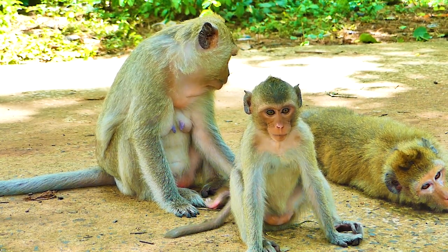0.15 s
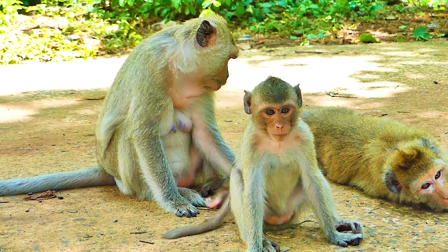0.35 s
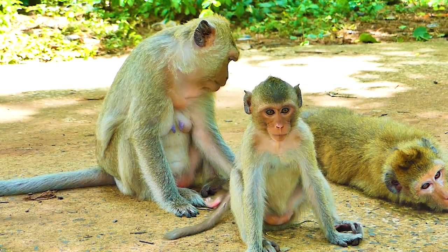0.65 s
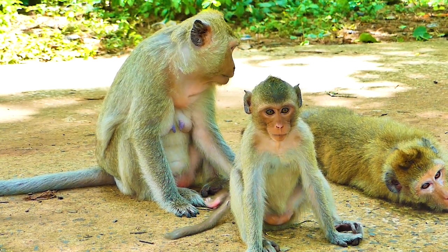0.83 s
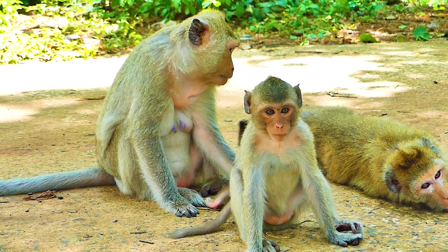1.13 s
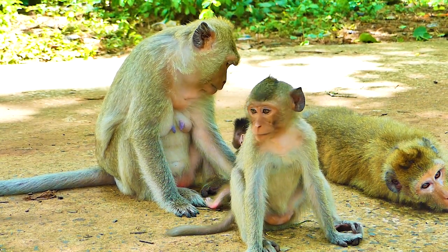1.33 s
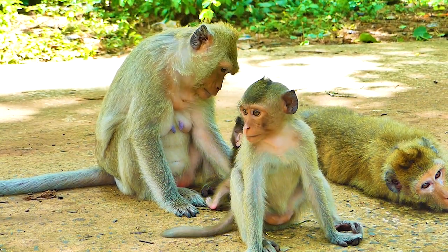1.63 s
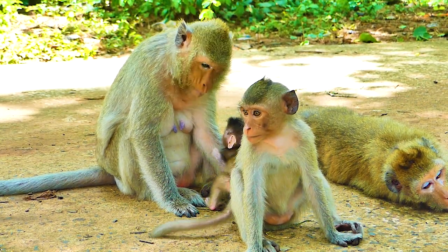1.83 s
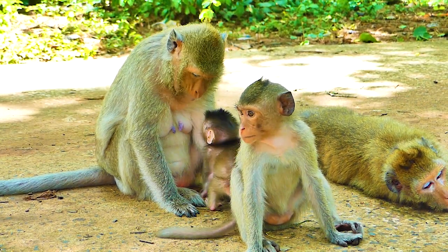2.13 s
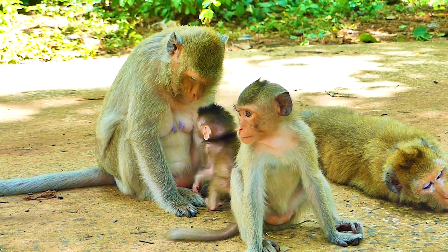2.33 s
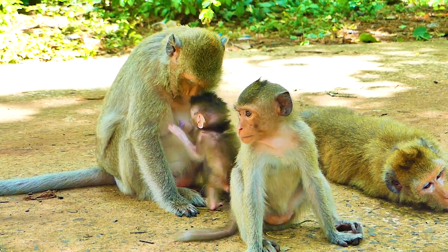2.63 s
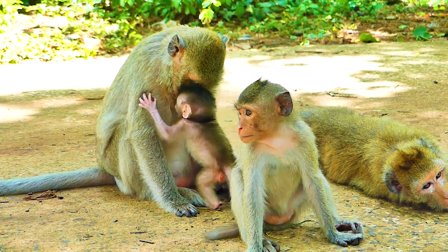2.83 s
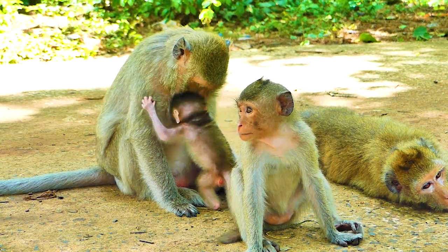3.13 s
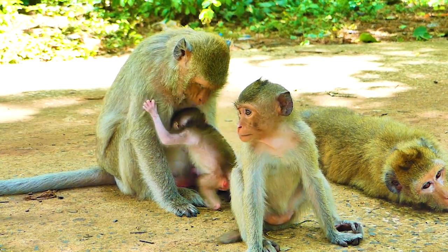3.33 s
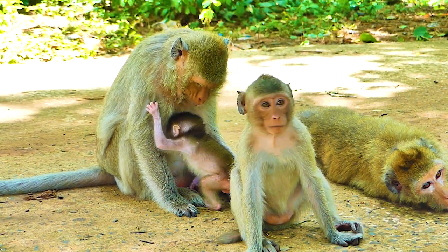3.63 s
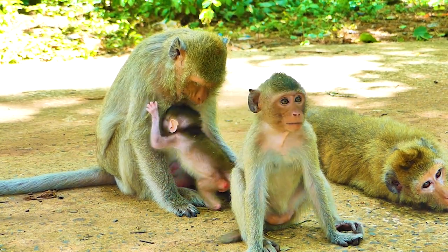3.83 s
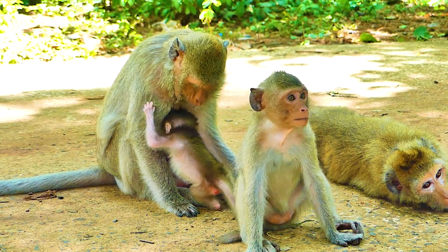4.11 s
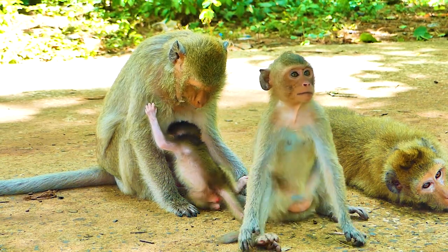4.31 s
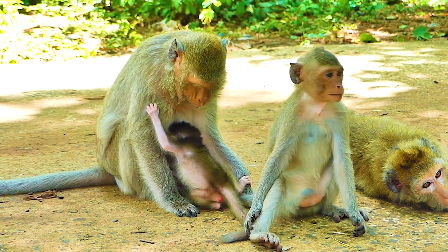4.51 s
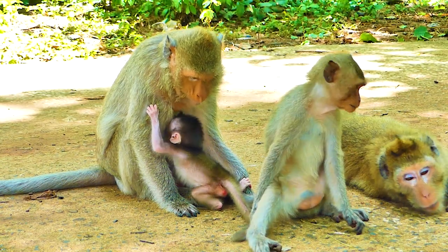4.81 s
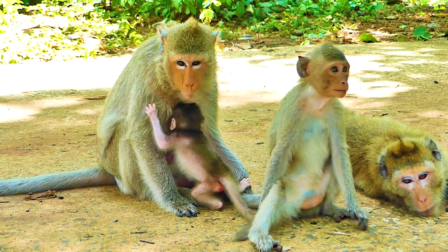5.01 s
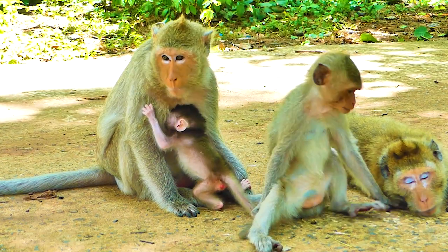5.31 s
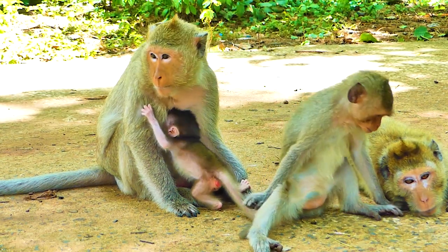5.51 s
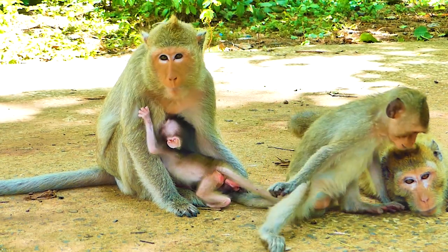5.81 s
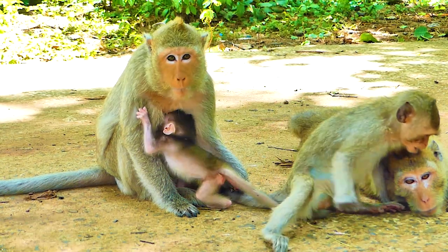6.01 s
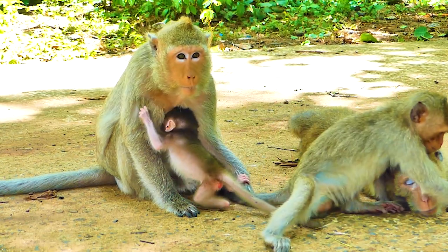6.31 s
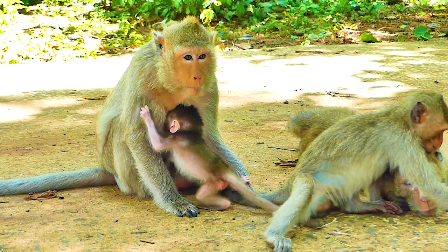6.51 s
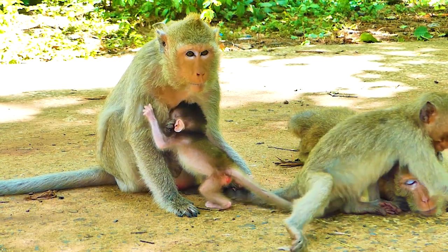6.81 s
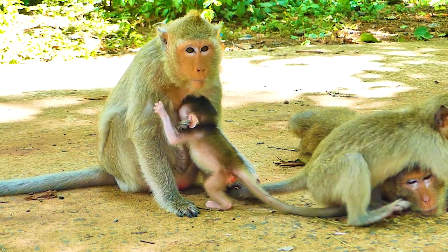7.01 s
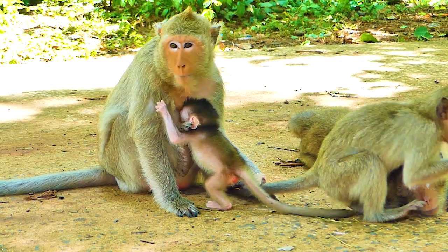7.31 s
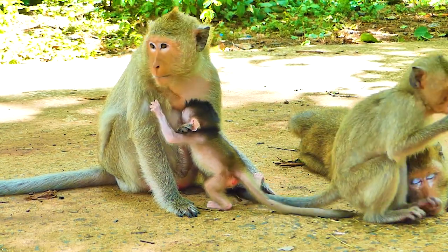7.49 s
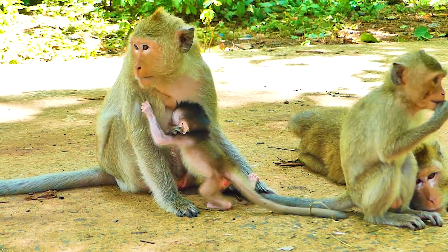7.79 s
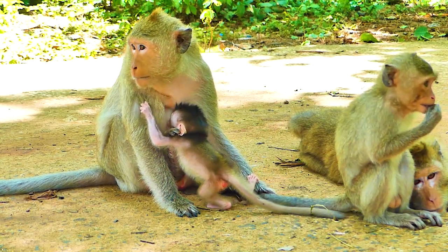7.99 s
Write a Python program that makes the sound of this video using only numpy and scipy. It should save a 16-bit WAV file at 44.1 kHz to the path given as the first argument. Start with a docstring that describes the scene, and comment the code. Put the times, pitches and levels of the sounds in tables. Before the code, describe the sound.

A cicada trills in slow surges that grow louder over rustling leaves and faint birds, while monkeys scuff and snap grit close by.

```python
"""Cicada and monkeys at a forest edge

A paved clearing in stereo. A low rumble with a narrow drone lies far off; filtered noise rustles as leaves.
A cicada, clicks ringing at a gliding pitch, trills in slow surges that grow louder over a thin, steady insect
of narrow noise. Birds, most of their tones gliding, whistle and chirp far off in the trees. Close to the
microphones monkeys shift about on gritty ground: noise bursts snap and knock, runs of tiny grains scuff."""
import sys
import numpy as np
from scipy import signal
from scipy.fft import rfft, irfft, next_fast_len
from scipy.io import wavfile
from scipy.ndimage import uniform_filter1d

SR = 44100
rng = np.random.default_rng(int(sys.argv[2]) if len(sys.argv) > 2 else 0)


def transcribe(u):
    """Save the signal u as a 16-bit wav file named by the first command-line argument.

    u: samples, shape (n,) or (channels, n), limited to [-1, 1]; the rate is SR.
    q: integer samples, one column per channel.
    """
    v = np.clip(np.atleast_2d(u).T, -1, 1)
    q = np.round(v * 32767).astype(np.int16)
    wavfile.write(sys.argv[1], SR, q)


N = 359415
TIME = np.arange(N) / SR  # s

# where the monkeys sit: left minus right [dB]
LEFT, MIDDLE, RIGHT = 7.9, 0, -6.5

# spectrum of the far rumble: (frequency [Hz], relative level [dB])
RUMBLE_SPECTRUM = [(15, -68.5), (25, -51), (60, -9.5), (114, -2), (162, 0.5), (189, 1), (285, -6),
                   (354, -6), (450, -6.5), (637, -10), (680, -14.5), (2400, -24), (3250, -40), (4220, -22),
                   (4500, -24), (5850, -65), (9900, -120)]
# spectrum of the foliage: (frequency [Hz], relative level [dB])
LEAF_SPECTRUM = [(900, -3), (2000, 1), (3000, 3.5), (4200, 0.5), (6300, 1), (7800, -3), (9600, 0),
                 (11500, -3.5), (15500, -9)]
# colour of sounds made on the paving: (frequency [Hz], gain [dB])
GROUND_COLOUR = [(120, 4), (280, 5), (520, 1), (790, -1.5), (1100, -0.5), (1600, -4), (2500, 1.16),
                 (3700, -3.5), (4600, -0.5), (7000, -0.5), (7800, -4.5), (9500, 1.5), (14000, -5.5)]
# stereo width of the surroundings: (frequency [Hz], side minus middle [dB])
SURROUND_WIDTH = [(60, -1), (110, -3.5), (200, -2.5), (380, 2.5), (700, 2), (1290, 1.5), (2380, -3.5),
                  (4400, -6), (8120, -7), (15000, 0)]
# leaves stirred by the breeze: (time of the height [s], half length [s], rise [dB])
BREEZE_GUSTS = [(0.832, 0.21, 4), (1.683, 0.44, 1.5), (3.948, 0.28, 7), (4.795, 0.16, 4), (5.43, 0.14, 5.5),
                (6.55, 0.23, 3.5), (8.016, 0.22, 2)]
# a short piece of cicada song, then bird whistles, most of them falling, one level:
# (time [s], length [s], start [Hz], end [Hz], hoarseness [share of the pitch],
# level [dB], swell from start to end [dB])
GLIDES = [(0.068, 0.04, 5180, 4930, .005, -58, -5), (1.461, .16, 3300, 2726, .045, -59.5, -4),
          (1.945, .22, 3106, 2400, .018, -60.5, 1), (2.243, 0.07, 2700, 2590, .015, -61, 0),
          (2.43, 0.215, 3074, 2477, .026, -56, 14), (4.721, 0.26, 2190, 2005, .003, -56.5, 1),
          (5.124, 0.27, 2317, 2040, 0.0067, -54, -8), (6.039, 0.12, 2900, 2630, .012, -60, 5),
          (6.565, 0.27, 1940, 1700, 0.0036, -60, -4), (6.962, 0.26, 1990, 1615, .006, -64, -4),
          (7.91, 0.2, 1770, 1770, .002, -67.5, -5)]
CICADA_PIECE, BIRD_WHISTLES = GLIDES[:1], GLIDES[1:]
# slurs that arch over and fall back: (time [s], length [s], start [Hz], top [Hz], end [Hz],
# place of the top in the note [0-1], hoarseness [share of the pitch], level [dB])
ARCHED_CHIRPS = [(1.313, .11, 2800, 3850, 3500, 0.68, .07, -58),
                 (1.591, .11, 2750, 3360, 3000, .36, .05, -56.5),
                 (2.014, .12, 2780, 3860, 3450, 0.54, 0.068, -59),
                 (2.303, .11, 3050, 3484, 3260, .3, .06, -58),
                 (6.124, .088, 2620, 3350, 2720, 0.42, .014, -48.5)]
# high, quick chips: (time [s], level [dB])
HIGH_CHIPS = [(2.613, -56), (4.228, -50.5), (7.738, -49.5)]
# cicada surges, a low swell that climbs to a held note and sags again:
# (time [s], low pitch [Hz], held pitch [Hz], swell level [dB], held level [dB]), before strain and sag
CICADA_SURGES = [(.45, 5150, 5390, -60.5, -71), (1.26, 5210, 5420, -58, -67),
                 (2.08, 5180, 5410, -57, -66.5), (2.91, 5170, 5400, -55, -63),
                 (3.75, 5170, 5380, -54.5, -63), (4.56, 5120, 5440, -50.5, -54),
                 (5.33, 5073, 5583, -53.5, -54.5), (6.19, 5130, 5540, -47.5, -51),
                 (6.99, 5076, 5545, -46.5, -50.5), (7.77, 5130, 5516, -46.5, -51.5)]
# hands and feet scuffing: (time [s], length [s], level [dB], weight [dB], place [dB])
MONKEY_SCUFFS = [ (0.137, 0.072, -58.5, -8, LEFT), (.801, 0.069, -58, -7, LEFT),
                 (2.167, 0.055, -58, -6, LEFT), (2.272, 0.048, -57, -2, LEFT),
                 (3.295, 0.055, -64, -15, MIDDLE), (3.39, 0.13, -63.5, -10, MIDDLE),
                 (4.785, 0.06, -51, 1, RIGHT), (5.4, 0.027, -44.5, -8, RIGHT),
                 (5.433, 0.04, -45.5, 1.5, RIGHT), (5.565, 0.043, -52, 8, RIGHT),
                 (5.864, 0.079, -49, 0.5, RIGHT), (5.915, 0.056, -43, 4, RIGHT),
                 (5.968, .12, -56.5, -4.5, RIGHT), (6.296, 0.025, -61, 9.5, RIGHT),
                 (6.41, .025, -74, -28, RIGHT), (6.46, 0.031, -51, 3.5, RIGHT),
                 (6.533, .06, -62.5, 9, RIGHT), (7.199, 0.085, -58, -8.5, LEFT),
                 (7.722, 0.029, -56.5, 8, RIGHT), (8.018, 0.039, -76, -35, RIGHT)]
# hands and feet set down: (time [s], knock level [dB], decay [s], knock [Hz], grit underneath [dB], place [dB])
MONKEY_STEPS = [(.260, -52.5, .0016, 700, -0.5, LEFT), (.695, -52.5, 0.0049, 900, -7, LEFT),
                (1.187, -45.5, 0.0028, 430, -26, LEFT), (4.991, -32.5, 0.0012, 524, -16, RIGHT),
                (5.050, -36, 0.0045, 562, -17, RIGHT), (5.397, -29.5, 0.004, 676, 1, RIGHT),
                (5.558, -38, 0.0055, 418, -26, RIGHT), (5.571, -33.5, 0.0025, 1100, -4.5, RIGHT),
                (5.585, -36, 0.0021, 700, -13, RIGHT), (5.6093, -30.5, 0.0022, 442, -5, RIGHT),
                (5.628, -52, 0.0018, 716, -25, RIGHT), (6.482, -43, 0.0069, 400, -18, RIGHT),
                (6.541, -39.5, 0.0023, 1000, -4, RIGHT)]
# dry bits snapping: (time [s], level [dB], pitch [Hz], decay [s], place [dB])
DRY_SNAPS = [ (.036, -41.5, 9930, 0.0059, MIDDLE), (1.429, -53, 5520, 0.0015, LEFT),
             (1.597, -51, 6200, .0033, LEFT), (1.84, -41.5, 3660, .0013, LEFT),
             (2.186, -46, 3200, 0.01, LEFT), (3.307, -49, 5500, .0007, MIDDLE),
             (3.318, -46.5, 5500, .0007, MIDDLE), (3.349, -48, 4410, .0012, MIDDLE),
             (3.411, -53, 5800, .0016, MIDDLE), (4.756, -40.5, 2400, 0.003, RIGHT),
             (4.793, -36.5, 3550, 0.0017, RIGHT), (4.810, -32.5, 2400, .002, RIGHT),
             (5.014, -41.5, 2280, 0.0043, RIGHT), (5.3954, -29.5, 3930, .004, RIGHT),
             (5.454, -35, 2900, .0018, RIGHT), (5.4967, -30, 2600, 0.0015, RIGHT),
             (5.608, -29.5, 2470, 0.00077, RIGHT), (5.824, -42.5, 2280, 0.002, RIGHT),
             (5.837, -42, 3080, 0.0013, RIGHT), (5.882, -35, 3450, 0.0036, RIGHT),
             (5.894, -33.5, 3430, 0.0041, RIGHT), (5.912, -17.5, 2700, 0.0013, RIGHT),
             (5.952, -35, 2900, .0012, RIGHT), (5.962, -37, 2700, .001, RIGHT),
             (6.221, -44, 2100, .001, RIGHT), (6.304, -28, 2460, 0.0013, RIGHT),
             (6.465, -32, 2700, 0.0022, RIGHT), (6.48, -38, 4500, 0.0027, MIDDLE),
             (6.6273, -41.5, 3770, 0.0008, RIGHT), (6.661, -29.5, 3570, 0.0013, RIGHT),
             (6.791, -32, 3450, 0.0015, RIGHT), (7.202, -33.5, 2390, 0.0012, LEFT),
             (7.250, -41, 4510, 0.00096, LEFT), (7.7336, -28.5, 2360, .0011, RIGHT),
             (7.8265, -37, 4290, 0.0016, RIGHT)]

RUMBLE_DB, RUMBLE_RISE_DB_PER_S = -53.5, 0.1928
CALM_LEAVES_DB = -61.5
FAR_INSECT_HZ, FAR_INSECT_WIDTH_HZ, FAR_INSECT_DB = 5400, 150, -71
GLIDE_EASE = 1.9  # above 1, a glide is steepest at first
CHIRP_SWELL_DB = -3
CHIP_S, CHIP_START_HZ, CHIP_END_HZ, CHIP_QUAVER = 0.0259, 6260, 5600, 0.051
SURGE_PERIOD_S = .814
CLIMB_SKEW, CLIMB_ROUNDNESS = .7, .54
SWELL_LAG_S, SWELL_ATTACK_S, SWELL_RELEASE_S = 0.0577, .1, .16
SAG_DB, SAG_SHARE = 3.5, 0.68  # depth of the dip in level and its place in the surge
GRIT_DB, GRIT_PER_WEIGHT = -7.5, -0.75  # the more weight, the less grit skitters (dB, dB per dB)
STEP_RING_HZ, STEP_CRACK_DB = 2520, -9.5
DRAG_S, DRAG_DB, DRAG_WEIGHT_DB = 0.026, -24, 7.5  # every step slides a little
SNAP_KNOCK_HZ, SNAP_KNOCK_DB = 780, -11.5
# thinner bits ring higher and crack more brightly, up to a limit
CRACK_DB, CRACK_REF_HZ, CRACK_DB_PER_OCTAVE, CRACK_MAX_DB = -16.5, 3050, 29, -5.5
TOP_HZ = 15800


def undb(db):
    """Decibels to gain."""
    return 10 ** (np.asarray(db) / 20)


def unit(x):
    """Scale to rms 1."""
    return x / np.sqrt(np.mean(x ** 2) + 1e-24)


def band(x, hz, width_hz, order=1):
    """A resonance with gain 1 at its centre; applied twice it is steep."""
    hz = min(hz, .44 * SR)
    g, k = np.tan(np.pi * hz / SR), width_hz / hz
    numerator = [g * k, 0, -g * k]
    denominator = [1 + g * k + g * g, 2 * g * g - 2, 1 - g * k + g * g]
    for _ in range(order):
        x = signal.lfilter(numerator, denominator, x)
    return x


def walk(rate):
    """Random levels held for 1 / rate s and smoothed twice, at rms 1."""
    hold = max(int(SR / rate), 1)
    held = np.repeat(rng.standard_normal(N // hold + 1), hold)
    return unit(uniform_filter1d(uniform_filter1d(held, hold), hold)[:N])


def colour(x, points):
    """Filter a sound with a response of (frequency [Hz], gain [dB]) points."""
    hz, db = np.transpose(points)
    size = next_fast_len(N + SR // 10)
    f = np.maximum(np.fft.rfftfreq(size, 1 / SR), 1)
    response = undb(np.interp(np.log(f), np.log(hz), db))
    return irfft(rfft(x, size) * response, size)[..., :N]


def spread(pair, side_db):
    """Two unrelated sounds as the middle and side of a stereo image."""
    side = undb(side_db) * pair[1]
    return np.array([pair[0] + side, pair[0] - side])


def surround(pair):
    """Two unrelated sounds all around the listener, wider at some pitches than at others."""
    return spread([pair[0], colour(pair[1], SURROUND_WIDTH)], side_db=0)


def pan(pan_db):
    """Left and right gains for a level difference."""
    gains = undb(np.array([[pan_db], [-pan_db]]) / 2)
    return gains / gains.mean()


def add(out, s, sound):
    """Mix a stereo sound in at time s."""
    i = max(int(s * SR), 0)
    out[:, i:i + sound.shape[1]] += sound[:, :N - i]


def scatter(x, t60, wet_db, side_db):
    """The direct sound and a fading cloud of reflections from trunks, leaves and ground."""
    t = TIME[:SR]
    tail = spread(rng.standard_normal((2, SR)), side_db) * 1000 ** (-t / t60)
    response = undb(wet_db) * unit(tail) / np.sqrt(SR)
    response[:, 0] += 1  # direct sound
    wet = signal.fftconvolve(np.atleast_2d(x), response, axes=1)[:, :N]
    return wet / np.hypot(1, undb(wet_db))


def distance(drone_hz=202, drone_db=-63):
    """A wide low rumble of far traffic, slowly rising, with one narrow drone in it."""
    rumble = unit(colour(surround(rng.standard_normal((2, N))), RUMBLE_SPECTRUM))
    rumble_db = RUMBLE_DB + RUMBLE_RISE_DB_PER_S * TIME + 0.51 * walk(5)
    drone = band(surround(rng.standard_normal((2, N))), drone_hz, 14.0, order=2)
    return rumble * undb(rumble_db) + undb(drone_db) * unit(drone)


def leaves(tick_rate=45, tick_db=5, tick_size_db=3):
    """Soft hiss of foliage with single dry ticks in it, swelling with the breeze."""
    tick_sizes_db = tick_db + tick_size_db * np.minimum(rng.exponential(size=(2, N)), np.pi)
    ticks = (rng.random((2, N)) < tick_rate / SR) * undb(tick_sizes_db)
    hiss = unit(colour(surround(rng.standard_normal((2, N)) + ticks), LEAF_SPECTRUM))
    gust_db = sum(rise_db * np.exp(-((TIME - s) / half_s) ** 2) for s, half_s, rise_db in BREEZE_GUSTS)
    return hiss * undb(CALM_LEAVES_DB + gust_db + 0.76 * walk(15)) * pan(.5)


def far_insect():
    """A second insect farther off holds one thin note, a narrow band of noise blurred by distance."""
    trill = unit(band(rng.standard_normal(N), FAR_INSECT_HZ, FAR_INSECT_WIDTH_HZ, order=2))
    level_db = FAR_INSECT_DB + 2.9 * walk(4.8)
    return scatter(trill * undb(level_db), t60=0.41, wet_db=-2.0, side_db=-5.0)


def progress(length_s):
    """A ramp from 0 to 1 over a note."""
    return np.linspace(0, 1, int(length_s * SR))


def note(hz, quaver, db, swell_db=-3, quaver_rate=420, flutter_db=3.0):
    """One note along a pitch curve, clear or hoarse, fluttering as it swells or fades."""
    count = len(hz)
    wobble = quaver * np.tanh(1.74 * walk(quaver_rate)[:count])
    phase = 2 * np.pi * np.cumsum(hz * (1 + wobble)) / SR
    shape_db = np.linspace(0, swell_db, count) + flutter_db * walk(58)[:count]
    tone = np.sin(phase) * signal.windows.tukey(count, .15) * undb(shape_db)
    return unit(tone) * undb(db) * pan(-0.81)


def glides(rows):
    """Notes that ease from a start pitch to an end pitch."""
    out = np.zeros((2, N))
    for s, length, start_hz, end_hz, hoarse, db, swell_db in rows:
        hz = end_hz + (start_hz - end_hz) * (1 - progress(length)) ** GLIDE_EASE
        add(out, s, note(hz, hoarse, db, swell_db))
    return out


def smear(sound):
    """The forest smears a sound from far off in the trees."""
    return scatter(sound, t60=0.78, wet_db=3.5, side_db=-8.0)


def birds():
    """Whistles, most of them falling, one level; arched slurs and high chips."""
    out = glides(BIRD_WHISTLES)
    for s, length, start_hz, top_hz, end_hz, top_share, hoarse, db in ARCHED_CHIRPS:
        hz = np.interp(progress(length), [0, top_share, 1], [start_hz, top_hz, end_hz])
        add(out, s, note(hz, hoarse, db, CHIRP_SWELL_DB))
    for s, db in HIGH_CHIPS:
        hz = np.interp(progress(CHIP_S), [0, 1], [CHIP_START_HZ, CHIP_END_HZ])
        add(out, s, note(hz, CHIP_QUAVER, db))
    return smear(out)


def cicada_piece():
    """A short piece of the cicada's song, a single tone gliding down near 5 kHz."""
    return smear(glides(CICADA_PIECE))


def cicada(click_hz=215, ring_width_hz=385, strain_hz=160, unsteady_hz=45, body_hz=5360, body_width_hz=1300,
           low_mode_hz=4450, low_mode_width_hz=170, low_mode_db=-18.0):
    """Tymbal clicks ring the abdomen at a surging pitch over a faint fixed ring; the trees blur them."""
    starts, low_hz, held_hz, swell_db, held_db = np.transpose(CICADA_SURGES)
    low_hz, swell_db = (np.interp(TIME, starts, column) for column in (low_hz, swell_db))
    held_times = starts + SURGE_PERIOD_S / 2
    held_hz, held_db = (np.interp(TIME, held_times, column) for column in (held_hz, held_db))
    edges = np.r_[starts[0] - SURGE_PERIOD_S, starts, starts[-1] + SURGE_PERIOD_S]
    share = np.interp(TIME, edges, np.arange(len(edges))) % 1  # progress through each surge
    rise = abs(np.sin(np.pi * share ** CLIMB_SKEW)) ** CLIMB_ROUNDNESS
    # the swell peaks just after the lowest pitch
    swell = 0
    for s in starts + SWELL_LAG_S:
        width_s = np.where(TIME < s, SWELL_ATTACK_S, SWELL_RELEASE_S)
        swell = swell + np.exp(-((TIME - s) / width_s) ** 2)
    # the pitch slips downward while the insect strains and settles on the held note
    slip_hz = (unsteady_hz + strain_hz * (1 - rise + swell) / 2) * abs(walk(330))
    hz = low_hz + rise * (held_hz - low_hz) - slip_hz
    sag_db = SAG_DB * np.cos(np.pi * (share - SAG_SHARE)) ** 2
    db = held_db + swell * (swell_db - held_db) - sag_db
    cycles = np.cumsum(click_hz * (1 + .06 * walk(90))) / SR
    clicks = np.diff(np.floor(cycles), prepend=0) * undb(1.6 * walk(170))
    # each buckle starts a ring in a sharply bounded band, at a phase of its own
    ring_filter = signal.butter(7, ring_width_hz / 2, fs=SR, output="sos")
    buzz = signal.sosfilt(ring_filter, clicks * np.exp(2j * np.pi * rng.random(N)))
    carrier = np.exp(2j * np.pi * np.cumsum(hz) / SR)
    song = band((buzz * carrier).real, body_hz, body_width_hz, order=2)
    low_mode = band(abs(buzz) * rng.standard_normal(N), low_mode_hz, low_mode_width_hz, order=2)
    voice = unit(song) * undb(db) + unit(low_mode) * rise * undb(held_db + low_mode_db)
    return scatter(voice, t60=0.31, wet_db=1.5, side_db=-17.0) * pan(-1.4)


def grains(length_s, rate, size_db, side_db=-10):
    """A run of tiny clicks of uneven size that fades in and out."""
    shape = (2, int(length_s * SR))
    clicks = (rng.random(shape) < rate / SR) * rng.choice([-1, 1], shape)
    sizes = undb(size_db * np.minimum(rng.exponential(size=shape), np.pi))
    return spread(clicks * sizes * signal.windows.tukey(shape[-1], .4), side_db)


def drag(length_s, weight_db, grain_rate=240, grain_db=5, coarse_hz=1900, fine_hz=4300, ring_share=0.37,
         body_hz=950, count=5):
    """Skin drags over grit: grains crackle at several pitches, with a dull body where weight bears on them."""
    rasp = 0
    for hz in np.geomspace(coarse_hz, fine_hz, count):
        rasp = rasp + band(grains(length_s, grain_rate, grain_db), hz, ring_share * hz) / np.sqrt(hz)
    body = unit(band(grains(length_s, 1300, 3.6), body_hz, 1180, order=2))
    grit = unit(band(grains(length_s, 1100, grain_db), 6000, 9200, order=2))
    return unit(rasp) + undb(weight_db) * body + undb(GRIT_DB + GRIT_PER_WEIGHT * weight_db) * grit


def scuffs():
    """Longer drags, from light brushes of fur to a heavy heel."""
    out = np.zeros((2, N))
    for s, length, db, weight_db, place in MONKEY_SCUFFS:
        add(out, s, drag(length, weight_db) * undb(db) * pan(place))
    return out


def fracture(hz, decay_s, knock_hz, knock_db, crack_db, break_db, knock_share, ring_share, rise_s=0.00061,
             crumb_db=-21, crumb_s=0.0082, side_db=-11):
    """One sharp break and a burst of tiny fractures: its own ring, a knock on the ground, a bright crack."""
    t = TIME[:SR // 12]
    # a fainter, slower fall lets crumbs settle after the break
    fall = np.exp(-t / max(decay_s, 1 / SR)) + undb(crumb_db) * np.exp(-t / crumb_s)
    envelope = (1 - np.exp(-t / rise_s)) * fall
    first_break = undb(break_db) * signal.unit_impulse(len(t), int(rise_s * SR))
    noises = rng.standard_normal((3, 2, len(t)))
    burst = [first_break + spread(pair, side_db) * envelope for pair in noises]
    ring = unit(band(band(burst[0], hz, ring_share * hz), hz, 1.4 * hz))
    knock = unit(band(burst[1], knock_hz, knock_share * knock_hz, order=2))
    crack = unit(band(burst[2], 7100, 7800, order=2))
    # the level is that of the burst's first moments
    return (ring + undb(knock_db) * knock + undb(crack_db) * crack) * np.sqrt((decay_s + rise_s) / t[-1])


def steps():
    """A hand or foot knocks on the paving, crushes the grit under it and slides a little."""
    out = np.zeros((2, N))
    for s, db, decay_s, knock_hz, grit_db, place in MONKEY_STEPS:
        # levels inside are relative to the ring of the grit
        impact = fracture(STEP_RING_HZ, decay_s, knock_hz, -grit_db, STEP_CRACK_DB + grit_db,
                          break_db=-1.5, knock_share=1.7, ring_share=0.69)
        add(out, s, impact * undb(db + grit_db) * pan(place))
        add(out, s, drag(DRAG_S, DRAG_WEIGHT_DB) * undb(db + DRAG_DB) * pan(place))
    return out


def snaps():
    """Dry bits break under the monkeys; the thin ones crack brightest."""
    out = np.zeros((2, N))
    for s, db, hz, decay_s, place in DRY_SNAPS:
        crack_db = min(CRACK_DB + CRACK_DB_PER_OCTAVE * np.log2(hz / CRACK_REF_HZ), CRACK_MAX_DB)
        snap = fracture(hz, decay_s, SNAP_KNOCK_HZ, SNAP_KNOCK_DB, crack_db,
                        break_db=6.5, knock_share=1.9, ring_share=0.37)
        add(out, s, snap * undb(db) * pan(place))
    return out


def monkeys():
    """Close to the microphones and nearly dry, coloured by the paving."""
    contact = colour(scuffs() + steps() + snaps(), GROUND_COLOUR)
    return scatter(contact, t60=0.76, wet_db=-16.5, side_db=-3)


def scene():
    """From the far rumble through the trees to the monkeys close by."""
    background = distance() + leaves() + far_insect()
    return background + birds() + cicada_piece() + cicada() + monkeys()


def record(dry):
    """The recorder cuts the top steeply."""
    top_cut = signal.ellip(8, .1, 60, TOP_HZ, fs=SR, output="sos")
    return signal.sosfiltfilt(top_cut, dry)


dry = scene()
out = record(dry)
transcribe(out)
```